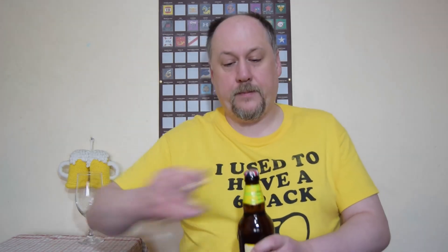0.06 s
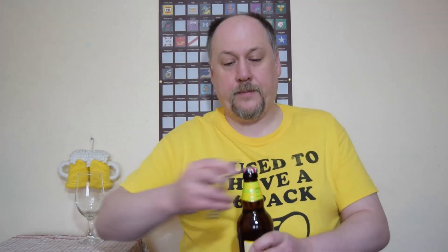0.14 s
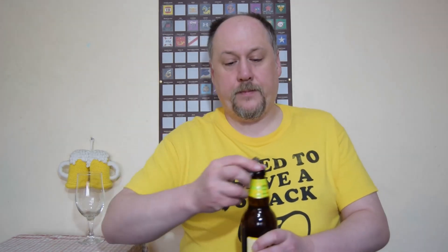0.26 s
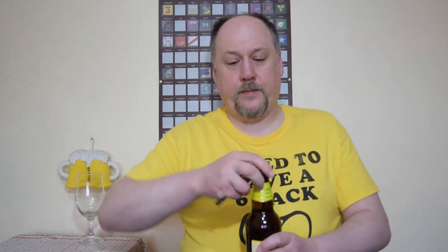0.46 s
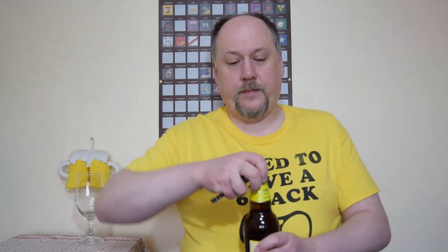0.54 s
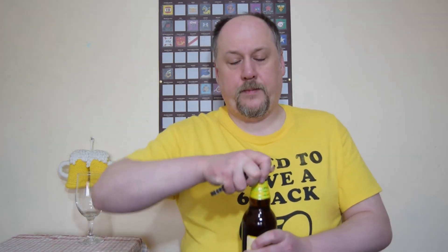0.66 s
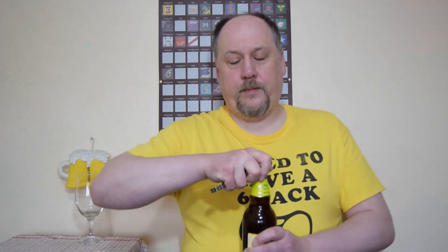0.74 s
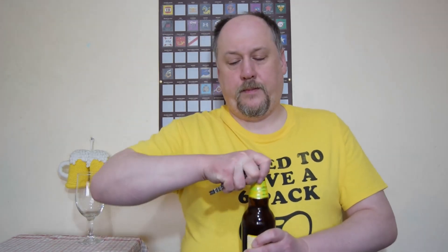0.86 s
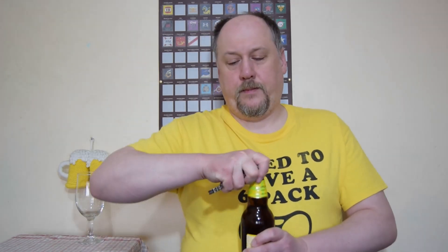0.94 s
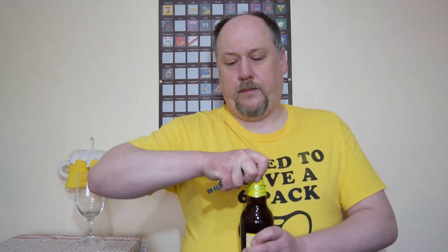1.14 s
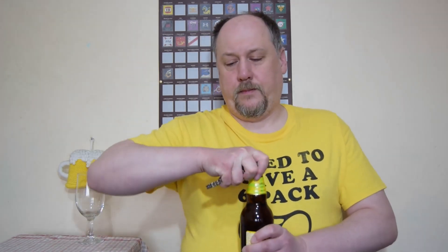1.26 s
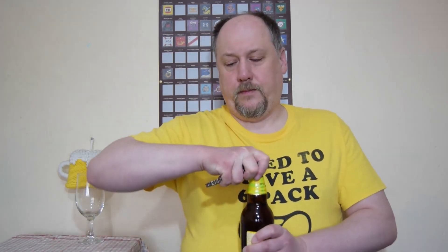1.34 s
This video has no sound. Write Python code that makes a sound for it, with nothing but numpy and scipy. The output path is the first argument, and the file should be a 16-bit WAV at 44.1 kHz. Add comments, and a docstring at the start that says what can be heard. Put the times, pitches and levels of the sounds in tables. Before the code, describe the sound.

Someone opens a beer bottle: quick ringing clinks of a metal opener on glass, a faint rub and a dull knock as the cap lifts, then a short, fading hiss of gas in a small, quiet room.

```python
"""A glass beer bottle is opened with a steel opener in a small, quiet room.
The opener clinks against neck and cap, ringing glass and steel, then rubs as it seats itself.
Levered up, the cap gives with a dull knock, and gas hisses out through the resonant gap under
its rim until the pressure is spent. Mains hum and faint hiss lie beneath."""
import sys
import numpy as np
from scipy import signal
from scipy.fft import rfft, irfft
from scipy.io import wavfile

SR = 44100
rng = np.random.default_rng(int(sys.argv[2]) if len(sys.argv) > 2 else 0)


def generate_wav(signal):
    """Clip the signal to [-1, 1] and save it as 16-bit WAV at the path in sys.argv[1]."""
    frames = np.transpose(np.atleast_2d(signal))
    scaled = np.clip(frames, -1, 1) * 32767
    pcm = np.round(scaled).astype(np.int16)
    wavfile.write(sys.argv[1], SR, pcm)


N = 61739
T = np.arange(N) / SR
HZ = np.maximum(np.fft.rfftfreq(N, 1 / SR), 1)


def from_db(db):
    """Decibels to gain."""
    return 10 ** (np.asarray(db) / 20)


def unit_rms(x):
    """Scale to unit rms."""
    return x / np.sqrt(np.mean(x ** 2) + 1e-20)


def colour(x, spectrum, peaks=()):
    """Shape by an interpolated spectrum and bell-shaped peaks."""
    hz, db = np.transpose(spectrum)
    curve_db = np.interp(np.log(HZ), np.log(hz), db)
    for centre_hz, width_hz, lift_db in peaks:
        curve_db += lift_db * np.exp(-2 * ((HZ - centre_hz) / width_hz) ** 2)
    return irfft(rfft(x) * from_db(curve_db), N)


def noise(spectrum, peaks=()):
    """Coloured noise, unit rms."""
    return unit_rms(colour(rng.standard_normal(N), spectrum, peaks))


def resonant_noise(hz, width_hz):
    """Noise through one resonance, unit rms."""
    b, a = signal.iirpeak(hz, hz / width_hz, fs=SR)
    return unit_rms(signal.lfilter(b, a, rng.standard_normal(N)))


def decay(start_s, t60_s):
    """Step to 1, then exponential decay."""
    return (T >= start_s) * from_db(-60 * np.maximum(T - start_s, 0) / t60_s)


def swell(centre_s, sigma_s):
    """Gaussian envelope."""
    return np.exp(-.5 * ((T - centre_s) / sigma_s) ** 2)


def butter(x, hz, kind="low", order=2):
    """Butterworth low- or high-pass."""
    sos = signal.butter(order, min(hz, .48 * SR), kind, fs=SR, output="sos")
    return signal.sosfilt(sos, x + 1e-18)


def ring(start_s, modes, t60_scale=1, scatter_db=2):
    """Struck modes; their levels scatter from blow to blow."""
    out = 0
    for k, (hz, db, t60_s) in enumerate(modes):
        gain = (-1) ** k * from_db(db + scatter_db * rng.standard_normal())
        out += gain * decay(start_s, t60_s * t60_scale) * np.sin(2 * np.pi * hz * (T - start_s))
    return out


# mains harmonics: f/Hz, rms level/dB
HUM_PARTIALS = [(50, -56), (150, -64), (250, -73.5)]
def mains_hum():
    """Steady odd harmonics of 50 Hz."""
    return sum(np.sqrt(2) * from_db(db) * np.sin(2 * np.pi * (hz * T + rng.random()))
               for hz, db in HUM_PARTIALS)


# room hiss: f/Hz, level/dB
FLOOR_SPECTRUM = [(41, -45), (70, -6.5), (92, -8.5), (151, -13), (286, -12), (515, -14.5), (590, -15),
                  (829, -17.5), (1870, -21.5), (7820, -24.5), (15800, -24.5)]
# side relative to mid: f/Hz, level/dB
FLOOR_SIDE_SPECTRUM = [(50, -15), (200, -13), (500, -13.5), (1500, -13), (12000, -9)]
def room_hiss():
    """Faint steady noise, as mid and side."""
    mid, side = (from_db(-53) * butter(noise(FLOOR_SPECTRUM), 67.4, "high", order=1) for _ in range(2))
    return mid, colour(side, FLOOR_SIDE_SPECTRUM)


# capped bottle, damped by the hand: f/Hz, level/dB, t60/s
GLASS_MODES = [(1260, -10, 0.046), (1373, -5, 0.19), (3060, -4, 0.11), (3245, -2.5, 0.072),
               (3350, -10, 0.14), (4090, -15, 0.2), (4408, -7, 0.086), (4840, -10, 0.061),
               (5750, -9.5, 0.15), (5880, -13.5, 0.19), (6130, -21, 0.049)]
# opener: f/Hz, level/dB, t60/s
STEEL_MODES = [(5750, -5, .1), (6980, -9, .11), (7330, -8, .09), (7690, -5, .14), (8130, -6, .13),
               (8278, -1, .13), (8650, -4, .09), (8958, -4, .13), (9237, -2, .13), (9608, -6, .13),
               (13250, -13, .1)]
# dense, short-lived contact overtones, low to high: f/Hz, level/dB
THUD_SPECTRUM = [(120, -32), (280, -9.5), (420, -2), (600, -0.5), (800, 3.5), (1000, -4.5), (1500, -2.5),
                 (3000, -24)]
CLACK_SPECTRUM = [(200, -46), (550, -23), (900, -1), (1400, 4), (2300, -4.5), (3200, -1.5), (3800, -2.5),
                  (4600, 0), (8000, 1), (16000, -25)]
TICK_SPECTRUM = [(2000, -20), (5000, -1), (8200, -3), (10500, -3.5), (14500, -4.5), (16000, -8)]
# opener on bottle: t/s, glass/dB, sing/dB, steel/dB, clack/dB, tick/dB, thud/dB, cutoff/Hz, t60 factor
CONTACTS = [(.2050, -57, -45, -44, -42, -44, -66, 9000, 0.33),
            (0.2086, -23.5, -27, -38.5, -23, -23.5, -24, 7150, 0.87),
            (0.2532, -39, -46, -20, -27, -26, -45, 12000, 0.58),
            (.2570, -32, -22.5, -32.5, -22, -21, -47, 10800, 1.03),
            (0.2629, -29.5, -50, -45, -25, -52, -36.5, 5940, 0.69),
            (0.2958, -42, -50, -44, -39.5, -58, -42, 6000, 0.85),
            (0.3414, -17.5, -23.5, -45, -27.5, -23, -34, 5300, 0.4),
            (0.4543, -24.5, -27.5, -62, -35.5, -64, -36.5, 2520, 0.13),
            (0.4789, -47.5, -67, -60, -43.5, -43.5, -54, 12000, 0.73),
            (0.6905, -68, -61, -57.5, -68, -49, -70, 9000, .3)]
def clinks():
    """Impact noise and ringing of glass and steel; each contact has its own brightness and decay."""
    impacts, rings = 0, 0
    for start_s, glass_db, sing_db, steel_db, clack_db, tick_db, thud_db, cut_hz, t60_scale in CONTACTS:
        thud = from_db(thud_db) * noise(THUD_SPECTRUM) * decay(start_s, t60_s=.036)
        clack = from_db(clack_db) * noise(CLACK_SPECTRUM) * decay(start_s, t60_s=.035)
        tick = from_db(tick_db) * noise(TICK_SPECTRUM) * decay(start_s, t60_s=.02)
        glass = from_db(glass_db) * ring(start_s, GLASS_MODES, t60_scale)
        # clearest glass mode; its level depends on where the blow lands
        sing = ring(start_s, [(3120, sing_db, .2)], t60_scale)
        steel = from_db(steel_db) * ring(start_s, STEEL_MODES, t60_scale)
        impacts += thud + butter(clack, cut_hz) + tick
        rings += butter(glass, cut_hz) + sing + steel
    # so small a body radiates little bass
    return butter(impacts, 327, "high"), butter(rings, 705, "high")


# cap under the opener: f/Hz, level/dB
CRUNCH_SPECTRUM = [(150, -20), (280, -2), (450, -10), (1000, -9.5), (1400, -8.5), (2000, -5), (2700, -26),
                   (4500, -17), (12000, -38)]
# opener rubbing: centre t/s, sigma/s, crunch/dB, resonance f/Hz, resonance/dB
CAP_RUBS = [(.572, 0.017, -68, 567, -51.5), (0.588, 0.035, -56, 600, -64),
            (0.687, 0.016, -55.5, 415, -55.5)]
# cap bending: t/s, level/dB, f/Hz, t60/s, crunch/dB
CAP_KNOCKS = [(0.6557, -30, 498, 0.032, -46), (0.6955, -49, 1830, 0.031, -44.5)]
def levering():
    """The cap yields in dull knocks; the opener rubs as it takes hold."""
    out = 0
    for start_s, db, hz, t60_s, crunch_db in CAP_KNOCKS:
        out += ring(start_s, [(hz, db, t60_s)])
        out += from_db(crunch_db) * noise(CRUNCH_SPECTRUM) * decay(start_s, t60_s=.042)
    for centre_s, sigma_s, crunch_db, hz, resonance_db in CAP_RUBS:
        crunch = from_db(crunch_db) * noise(CRUNCH_SPECTRUM)
        resonance = from_db(resonance_db) * resonant_noise(hz, width_hz=70)
        out += swell(centre_s, sigma_s) * (crunch + resonance)
    return out


# main gas flow: f/Hz, level/dB
HISS_SPECTRUM = [(300, -39), (700, -25), (1100, -25), (1500, -23.5), (2100, -16.5), (2550, -19.5),
                 (4100, -6.5), (5000, -2), (6200, -4), (7400, 0.5), (10300, -1.5), (13000, -2),
                 (15700, -5.5)]
# bright jet at full pressure, also the first leak: f/Hz, level/dB
JET_SPECTRUM = [(700, -32), (1100, -13.5), (1600, -34), (3000, -14), (8000, -14), (10000, -5.5),
                (15700, -2.5)]
# jet peaks: f/Hz, width/Hz, lift/dB
JET_RESONANCES = [(9470, 540, 12.7), (11400, 190, 6.2), (11860, 600, 11), (13300, 460, 10.5)]
# gap under the cap: f/Hz, width/Hz, level/dB
GAP_RESONANCES = [(2576, 140, -0.5), (3090, 330, -3), (3480, 270, -1), (4880, 260, 1.5), (5200, 170, 0.5),
                  (5400, 340, -2), (6800, 730, 3.5), (7860, 440, 1.5)]
def escaping_gas():
    """Hiss grows as the gap opens and sinks with the pressure; the gap's resonances last longest."""
    start_s, open_s, fade_s, stop_s, release_s = .7374, .12, 1.037, 1.146, .03
    hiss_db_per_s, fade_db_per_s, gap_db_per_s = -64, -136, -57
    opening = np.clip((T - start_s) / open_s, 0, 1)
    emptying_s = np.maximum(T - start_s - open_s, 0)
    flowing = .5 - .5 * np.tanh((T - stop_s) / release_s)
    flutter_db = -.47 * unit_rms(butter(rng.standard_normal(N), hz=90))
    hiss_db = -26 + hiss_db_per_s * emptying_s + fade_db_per_s * np.maximum(T - fade_s, 0)
    hiss = from_db(hiss_db) * noise(HISS_SPECTRUM)
    jet = from_db(-23.5) * swell(centre_s=.823, sigma_s=.031) * noise(JET_SPECTRUM, JET_RESONANCES)
    gap = sum(from_db(db) * resonant_noise(hz, width_hz) for hz, width_hz, db in GAP_RESONANCES)
    gap = unit_rms(butter(gap, 2440, "high", order=6))
    whistle = from_db(-33 + gap_db_per_s * emptying_s) * flowing * gap
    first_leak = from_db(-39) * decay(start_s, t60_s=.29) * noise(JET_SPECTRUM)
    return from_db(flutter_db) * (opening ** .85 * (hiss + jet) + opening ** .7 * whistle + first_leak)


# room reflections: f/Hz, level/dB
REVERB_SPECTRUM = [(100, 5), (500, -0.5), (1500, 4), (3000, 4.5), (6000, 1.5), (9000, 1.5), (12000, -2.5),
                   (16000, 3.5)]
def reverb(x, t60_s=.25, build_s=.0066):
    """Dense reflections that build quickly and die away."""
    tail = noise(REVERB_SPECTRUM) * decay(0, t60_s) * (1 - np.exp(-T / build_s))
    return signal.fftconvolve(x, tail / np.sqrt(np.sum(tail ** 2)))[:N]


def scene():
    """Bottle and hum centred; only the room hiss has width."""
    impacts, rings = clinks()
    handling = impacts + levering()
    hum = mains_hum()
    floor_mid, side = room_hiss()
    reflections = from_db(-4) * reverb(handling + from_db(-10) * rings)
    mid = hum + floor_mid + handling + rings + reflections + escaping_gas()
    return np.array([mid + side, mid - side])


def record(dry, cutoff_hz=15750):
    """Steep elliptic low-pass."""
    return signal.sosfilt(signal.ellip(12, .1, 80, cutoff_hz, fs=SR, output="sos"), dry)


dry = scene()
out = record(dry)
generate_wav(out)
```